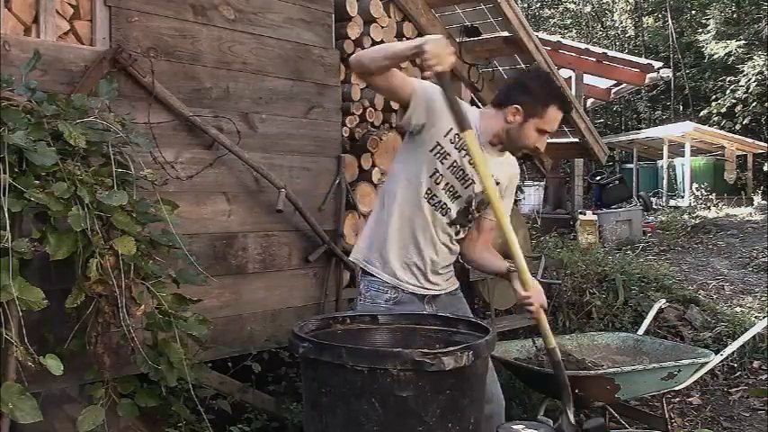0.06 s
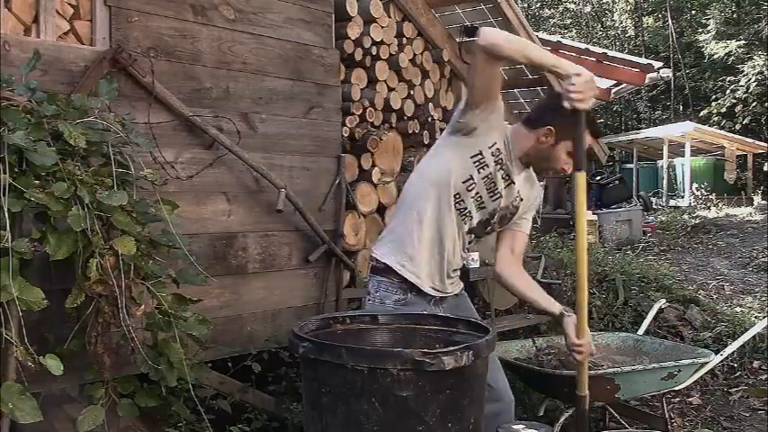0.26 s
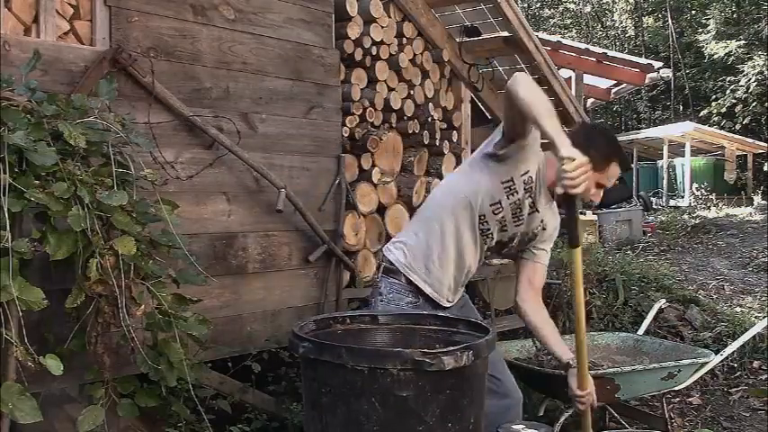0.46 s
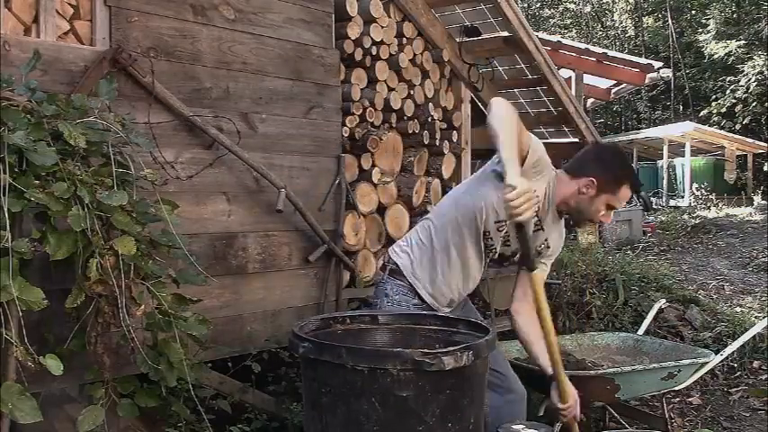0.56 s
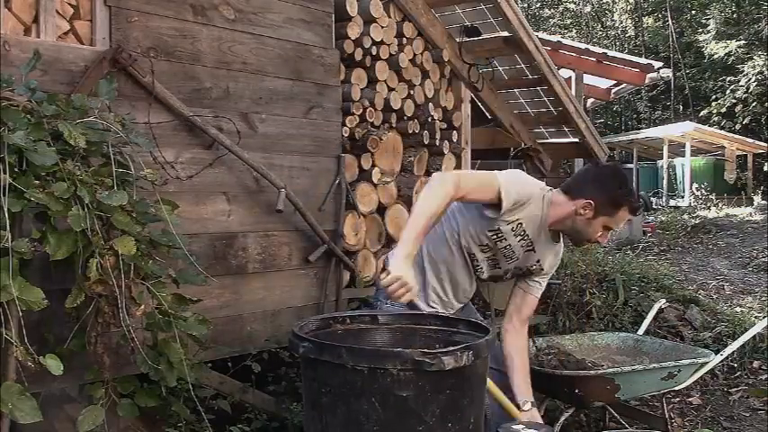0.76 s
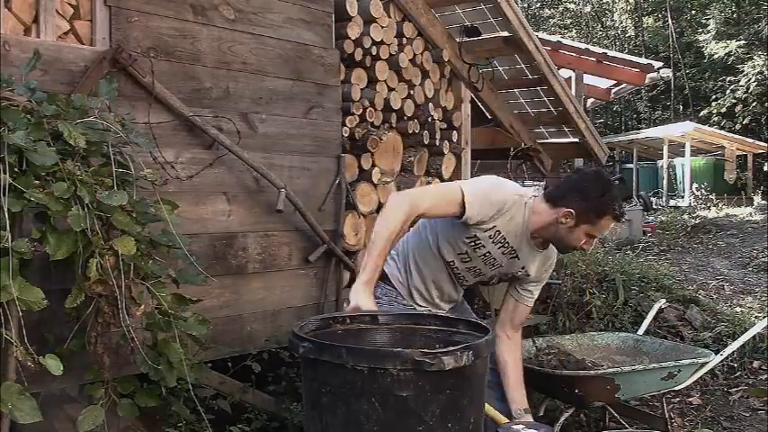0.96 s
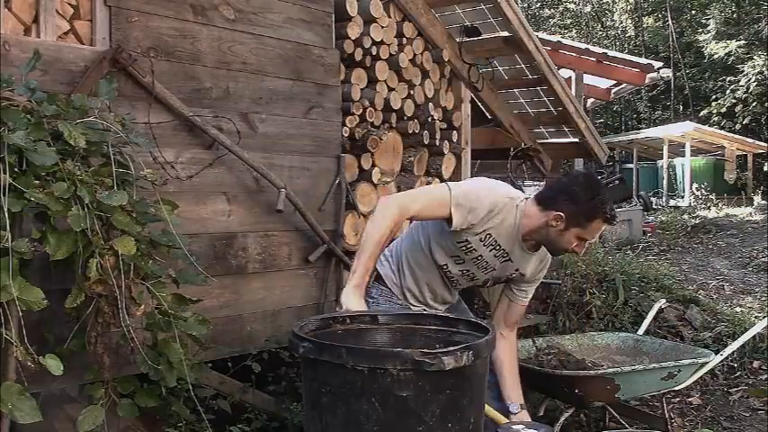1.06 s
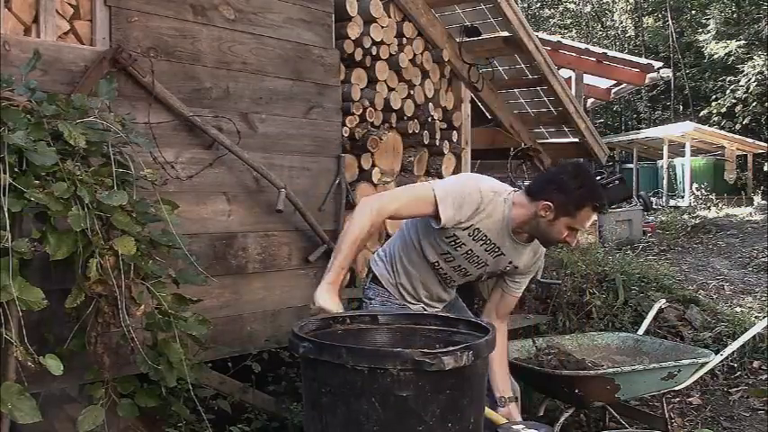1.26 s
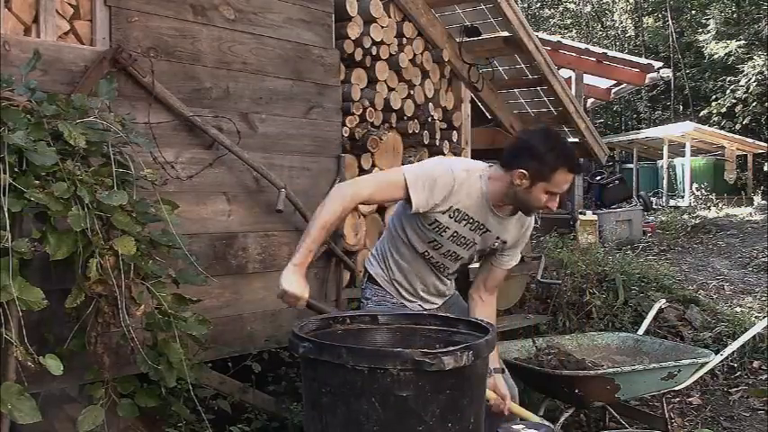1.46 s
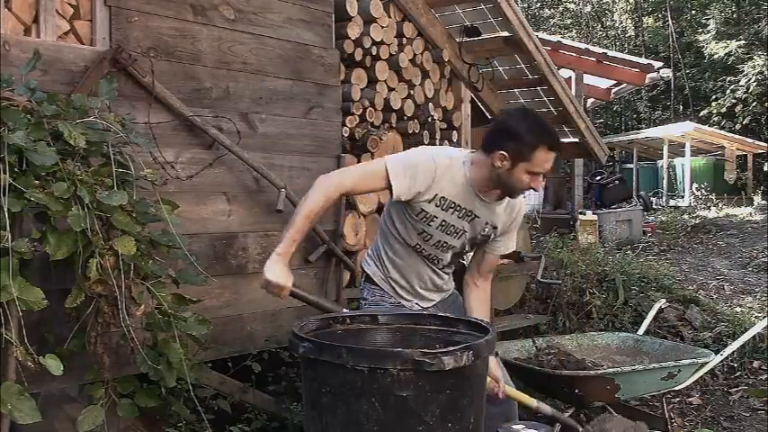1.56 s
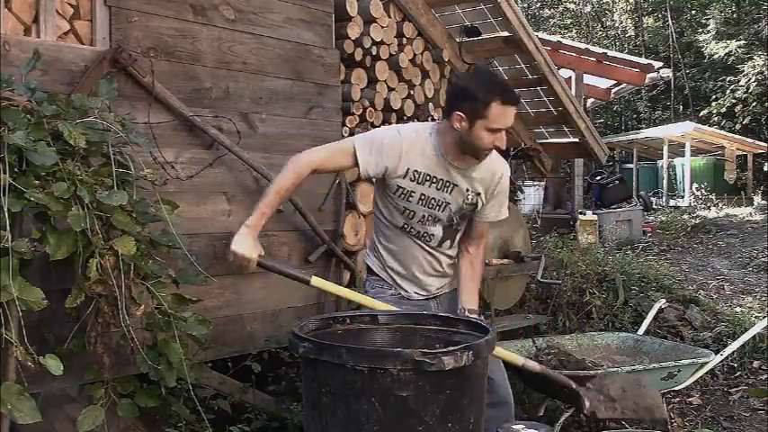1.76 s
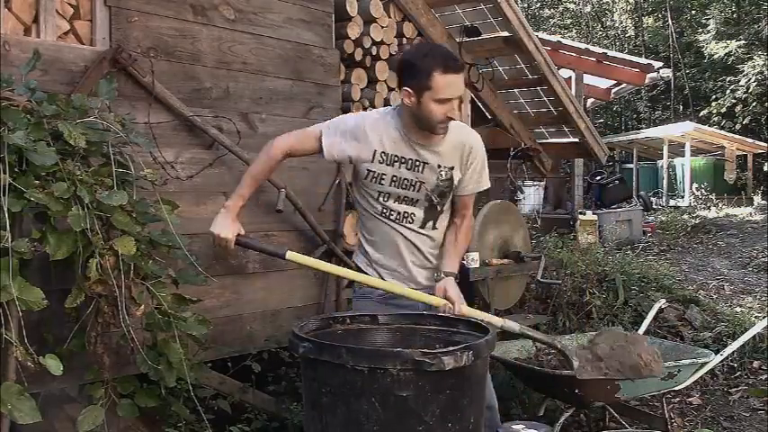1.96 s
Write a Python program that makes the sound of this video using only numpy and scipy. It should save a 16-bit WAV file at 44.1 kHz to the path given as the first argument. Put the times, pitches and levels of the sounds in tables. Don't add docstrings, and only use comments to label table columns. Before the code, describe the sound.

Metal shovel blade bites hard into stony sand, grinding and thudding in a quiet yard.

```python
import sys
import numpy as np
from scipy import signal
from scipy.io import wavfile
from scipy.ndimage import uniform_filter1d

SR = 44100
rng = np.random.default_rng(int(sys.argv[2]) if len(sys.argv) > 2 else 0)


def generate_wav(sig):
    pcm = np.round(np.clip(np.atleast_2d(sig).T, -1, 1) * 32767).astype(np.int16)
    wavfile.write(sys.argv[1], SR, pcm)


def rack_gain(trim_db):
    fader = np.asarray(trim_db, float)
    return 10 ** (fader / 20)


N = 88200


def evened(x):
    return x / np.sqrt(np.mean(x ** 2) + 1e-20)


def read(points, hz):
    f, value = np.transpose(points)
    return np.interp(np.log(hz + 1), np.log(f + 1), value)


def smooth_noise(count, size):
    return evened(uniform_filter1d(rng.standard_normal(count), size=size))


def colour(x, points):
    log_gain = np.log(rack_gain(read(points, abs(np.fft.fftfreq(4096, 1 / SR)))))
    response = np.exp(np.conj(signal.hilbert(log_gain)))
    taps = np.fft.ifft(response).real[:2048]
    return signal.oaconvolve(x, taps)[:N]


def resonate(x, hz, width):
    turn = np.exp(2j * np.pi * np.cumsum(hz * np.ones(N)) / SR)
    r = np.exp(-np.pi * width / SR)
    return 2 * (turn * signal.lfilter([1 - r], [1, -r], x / turn)).real


def swells(rows):
    t = np.arange(N) / SR
    power = np.zeros(N)
    for peak, rise, t60, db in rows:
        drop = np.where(t < peak, 30 * (peak - t) / rise, 60 * (t - peak) / t60)
        power += rack_gain(db - drop) ** 2
    return np.sqrt(power)


def grains(rows, per_s, spread_db, broad, rings, ring_db):
    hits = (rng.random(N) < per_s / SR) * rng.standard_normal(N)
    clicks = evened(hits * rack_gain(spread_db * np.minimum(rng.exponential(1, N), 4)))

    def ring(x):
        return sum(rack_gain(db) * resonate(x, hz, width) / np.sqrt(width) for hz, width, db in rings)

    driven = clicks * swells(rows)
    body = colour(driven, broad) / np.std(colour(clicks, broad))
    return body + rack_gain(ring_db) * ring(driven) / np.std(ring(clicks))


def struck_sine(t, hz):
    return (1 - np.exp(-(t * hz / 0.6) ** 2)) * np.sin(2 * np.pi * hz * t)


# frequency in Hz, level in dB per Hz.
AIR_SPECTRUM = [(25, -64), (60, -4), (200, -1), (600, -6), (2000, -12), (5000, -17.5), (10000, -26.5),
                (16000, -35)]
# frequency in Hz, likeness from -1 to 1.
AIR_LIKENESS = [(60, 1), (240, 0.69), (950, 0.67), (3770, 0.82), (15000, 1)]


def air():
    level_db, patchy_db = -56.5, 1.2
    frames, hz = N // 256 + 5, np.fft.rfftfreq(1024, 1 / SR)
    a, b, c, d, patches = rng.standard_normal((frames, 513, 5)).T
    patches = uniform_filter1d(patches, size=14, axis=0)
    patches = evened(uniform_filter1d(patches, size=8, axis=1))
    same = np.clip(read(AIR_LIKENESS, hz), -1, 1)[:, None]
    left = a + 1j * b
    right = same * left + np.sqrt(1 - same ** 2) * (c + 1j * d)
    z = np.array([left, right]) * rack_gain(read(AIR_SPECTRUM, hz)[:, None] + patchy_db * patches)
    return rack_gain(level_db) * evened(signal.istft(z, nperseg=1024, noverlap=768)[1][:, :N])


# peak in seconds, rise in seconds, T60 in seconds, level in dB.
INSECT_SWELLS = [
    (.15, 0.32, 0.66, -64.5),
    (1.45, 0.14, 1, -66),
]


def insects():
    def band(hz, width):
        once = resonate(rng.standard_normal(N), hz, width)
        return evened(resonate(once, hz, width))

    chorus = band(4100, 900) + rack_gain(-8.5) * band(7620, 200)
    return swells(INSECT_SWELLS) * chorus


# peak in seconds, rise in seconds, T60 in seconds, blade level in dB, grit level in dB.
SLIPS = [(0.016, 0.0019, 0.016, -50, -49), (0.021, 0.0026, 0.041, -55, -47.5),
         (.2, 0.0018, 0.019, -62, -49.5), (0.249, 0.00092, 0.18, -20, -33.5),
         (0.307, 0.058, 0.95, -50.5, -34), (0.38, 0.0019, 0.036, -20, -22), (0.416, 0.087, 0.16, -27, -26),
         (0.499, 0.054, 0.11, -37.5, -44.5), (0.557, 0.01, 0.19, -37.5, -52),
         (0.589, 0.015, 0.056, -33.5, -48), (0.612, 0.014, 0.12, -23.5, -22.5),
         (0.656, 0.025, 0.33, -41.5, -45.5), (0.708, 0.21, 0.32, -36, -42.5),
         (0.735, .02, 0.071, -62, -36.5), (0.78, 0.0031, 0.17, -34, -36.5), (0.978, 0.045, 0.2, -36.5, -41),
         (1.005, 0.033, 0.08, -37.5, -37), (1.137, .002, 0.26, -57.5, -57),
         (1.211, 0.0065, 0.18, -62, -59.5), (1.248, 0.006, 0.33, -58, -58), (1.55, 0.15, 0.17, -59, -70),
         (1.845, 0.04, 0.33, -58.5, -55), (1.672, 0.0033, 0.035, -52.5, -90), (1.895, 0.15, 0.15, -48, -52)]
# frequency in Hz, width in Hz, level in dB.
BLADE_MODES = [(1046, 110, -8.5), (1570, 74, -31), (1917, 51, 0.5), (2493, 69, 5.5), (2933, 120, 6.5),
               (3470, 83, 9), (3775, 57, 7.5)]
# frequency in Hz, level in dB.
BLADE_BODY = [(88, -44.5), (150, -12.5), (366, -7), (643, -9.5), (1570, -1), (1830, -7), (2210, -4.5),
              (9000, -24), (11700, -85), (19800, -120)]


def blade():
    rows = [(peak, rise, t60, db) for peak, rise, t60, db, _ in SLIPS]
    scrape = grains(rows, 5000, 0.71, BLADE_BODY, BLADE_MODES, ring_db=-5.5)
    return scrape + pebbles(rows)


def pebbles(rows):
    per_s, cycles, level_db = 50, 18, -1.5
    steady, forced = np.zeros((2, N))
    force, t = swells(rows), np.arange(3000) / SR
    for hz in np.geomspace(500.7, 5113, num=30):
        hits = (rng.random(N) < per_s / SR) * rng.standard_normal(N)
        u = hz * t / cycles
        ring = np.sqrt(hz) * np.sqrt(u) * np.exp(-3 * u) * np.sin(2 * np.pi * hz * t)
        steady += signal.oaconvolve(hits, ring)[:N]
        forced += signal.oaconvolve(hits * force, ring)[:N]
    return rack_gain(level_db) * colour(forced, BLADE_BODY) / np.std(colour(steady, BLADE_BODY))


# frequency in Hz, level in dB.
GRIT_BODY = [(1500, -6), (4500, -8), (5500, 1.5), (7000, -1.5), (10000, -6), (13000, -15), (16000, -24)]
# frequency in Hz, width in Hz, level in dB.
GRIT_MODES = [(5490, 130, 9), (6580, 130, 13), (7150, 100, 6.5), (7750, 67, -20)]


def grit():
    rows = [(peak, rise, t60, db) for peak, rise, t60, _, db in SLIPS]
    return grains(rows, 13000, 1.4, GRIT_BODY, GRIT_MODES, ring_db=-12)


# start in seconds, level in dB, frequency in Hz, T60 in seconds.
KNOCKS = [(.05, -50.5, 870, .15), (0.251, -26, 367, 0.27), (.251, -18, 945, 0.05), (.251, -22.5, 559, 0.13),
          (.252, -19.5, 2300, 0.097), (.253, -25.5, 1700, 0.12), (0.253, -25.5, 2840, 0.086),
          (.251, -21, 3330, 0.06), (0.555, -37, 214.5, 0.18), (0.631, -27, 226, 0.069),
          (.382, -19, 2420, 0.018), (.38, -17, 5640, 0.024), (0.381, -19.5, 7150, 0.033),
          (.3815, -20, 1360, 0.013), (.384, -16.5, 998, 0.02), (0.589, -25.5, 1617, .04),
          (0.607, -18, 1744, 0.042), (0.608, -25.5, 3890, 0.12), (.78, -19, 1550, 0.042),
          (0.784, -25, 4020, 0.049), (.783, -26.5, 2080, 0.077), (.783, -22.5, 2926, 0.041),
          (.611, -21.5, 2260, 0.023), (.614, -22, 6500, .04), (1.0052, -13.5, 305, 0.045),
          (1.006, -34, 690, .04), (1.014, -28, 1010, 0.037), (1.031, -28, 350, .05), (.251, -24, 290, .07),
          (.265, -22, 2150, .04), (1.329, -48, 1500, 0.037), (.292, -29, 5450, .08),
          (.405, -27, 1083, 0.17), (.41, -25, 1920, 0.098), (1.006, -38, 4030, 0.09),
          (1.023, -33, 416, 0.045), (1.045, -37, 340, 0.073), (1.137, -47, 5500, 0.017),
          (1.506, -53, 1085, .06), (1.754, -38, 258, 0.031), (1.771, -54.5, 1480, 0.35),
          (1.834, -34, 474, 0.031), (1.876, -29, 466, 0.05), (1.898, -30, 468, 0.045),
          (1.876, -38, 1030, .03), (1.899, -38, 1060, .03), (1.849, -45, 1900, .05)]


def knocks():
    out, t = np.zeros(N + SR), np.arange(SR // 2) / SR
    for start, db, hz, t60 in KNOCKS:
        drift = uniform_filter1d(smooth_noise(len(t), 200), size=200)
        waver = 1 + 0.25 * evened(drift)
        first = round(start * SR)
        out[first:first + len(t)] += waver * rack_gain(db - 60 * t / t60) * struck_sine(t, hz)
    return out[:N]


# start in seconds, level in dB, frequency in Hz.
TICKS = [(.2492, -2.5, 6000), (.2497, -6, 3070), (.2508, -15, 2800), (.2524, -12, 2930), (.255, -14, 1760),
         (.2566, -11, 2680), (.2618, -8, 2200), (.2672, -12, 1700), (.2773, -8.5, 2120), (.289, -16, 1500),
         (.2965, -25, 5500), (.3965, -18, 1090), (.4038, -27, 1290), (.4155, -6.5, 4220),
         (.4265, -15, 1130), (.497, -23, 1710), (.501, -19, 1600), (.611, -17, 3840), (.614, -13.5, 2240),
         (.6175, -10, 6500), (.7003, -24, 1830), (.712, -28, 600), (.715, -22, 1890), (.7345, -28, 7040),
         (.7823, -12, 4970), (.785, -16, 4040), (.7872, -7.5, 8600), (.827, -28, 4000), (.972, -27.5, 1010),
         (.981, -25, 1340), (1.0055, -18.5, 1330)]


def ticks():
    out, t = np.zeros(N + SR), np.arange(1000) / SR
    for start, db, hz in TICKS:
        first = round(start * SR)
        out[first:first + len(t)] += rack_gain(db - 60 * t * hz / 10.7) * struck_sine(t, hz)
    return out[:N]


# peak in seconds, rise in seconds, T60 in seconds, level in dB.
CRACKS = [
    (.2505, 0.0015, 0.16, -23),
    (.607, 0.0068, 0.044, -40),
    (.7815, 0.0041, 0.1, -27),
    (.965, 0.015, 0.056, -56),
    (1.33, 0.014, 0.089, -62.5),
    (1.877, 0.002, 0.054, -48),
    (1.9, .003, 0.029, -56.5),
]
# frequency in Hz, level in dB.
CRACK_BODY = [(300, -31), (1100, -10), (1700, 2.5), (3000, -3), (5000, -1), (7500, 2.5), (9500, -20),
              (16000, -73)]


def cracks():
    return grains(CRACKS, 10000, 1.3, CRACK_BODY, BLADE_MODES, ring_db=-2.7)


# peak in seconds, rise in seconds, T60 in seconds, level in dB.
SHOVES = [(.252, 0.0035, 0.13, -34), (.39, 0.029, 0.37, -50), (.502, .04, 0.091, -46.5),
          (.56, 0.0042, .15, -52), (.625, 0.019, 0.21, -36.5), (.666, 0.029, 0.085, -40),
          (.715, 0.092, 0.34, -35), (.783, 0.0032, 0.095, -36), (.85, 0.11, 0.033, -46),
          (1.01, 0.049, 0.15, -35), (1.16, 0.065, 0.08, -54.5), (1.56, 0.17, 0.26, -55),
          (1.85, 0.12, 0.48, -51), (1.92, 0.029, 0.073, -51.5)]
# frequency in Hz, level in dB.
SAND_BODY = [(40, -55), (100, -19), (170, -4), (220, 8), (550, -7), (900, -1.5), (2000, -36.5)]
# frequency in Hz, width in Hz, level in dB.
SAND_MODES = [(300, 72, -2.5), (363.8, 15.5, 3), (479, 26, -1), (576.4, 30, -3.5)]


def sand():
    return grains(SHOVES, 1200, 1.6, SAND_BODY, SAND_MODES, ring_db=-2)


def shovel():
    contact = blade() + grit() + knocks() + ticks() + cracks() + sand()
    high_pass = signal.butter(2, 168, "high", fs=SR, output="sos")
    return signal.sosfilt(high_pass, contact)


def yard(x):
    t60 = 0.026
    taps = np.zeros(4000)
    taps[np.arange(20, 3980, 20) + rng.integers(0, 20, 198)] = rng.choice([-1., 1.], 198)
    taps = taps * rack_gain(-60 * np.arange(4000) / SR / t60)
    return signal.fftconvolve(x, taps / np.linalg.norm(taps))[:N]


# time in seconds, low pipe in Hz, high pipe in Hz, level in dB.
WHISTLE = [
    (1.205, 2600, 2660, -67),
    (1.23, 2630, 2720, -59.5),
    (1.291, 2600, 2700, -60.5),
    (1.33, 2520, 2690, -62.5),
    (1.44, 2424, 2685, -61.5),
    (1.5, 2327, 2460, -65),
    (1.659, 2373, 2440, -67),
]


def bird():
    time, low, high, db = np.transpose(WHISTLE)
    t = np.arange(N) / SR

    def voice(pitch):
        flutter = 1 + 0.5 * smooth_noise(N, 400)
        hz = np.interp(t, time, pitch) + 35 * smooth_noise(N, 400)
        return flutter * np.sin(2 * np.pi * np.cumsum(hz) / SR)

    whistle = voice(low) + rack_gain(-1) * voice(high) + rack_gain(-6) * voice((low + high) / 2)
    return rack_gain(np.interp(t, time, db, -120, -120)) * whistle


# frequency in Hz, level in dB.
SIDE_SPECTRUM = [(100, -14), (300, -1), (550, 5.5), (1000, -1), (2000, 4), (4500, 3), (9500, 5),
                 (11000, -20)]


def scene():
    background = air() + insects()
    tool = shovel()
    side = rack_gain(-25.5) * colour(tool + rack_gain(-5.5) * yard(tool), SIDE_SPECTRUM)
    return background + tool + np.array([-side, side]) + bird()


def top_cut(x):
    return signal.sosfilt(signal.butter(12, 16290, fs=SR, output="sos"), x)


def record(dry):
    low_pass = signal.firwin(255, 15700, window=("kaiser", 9), fs=SR)
    mix = signal.oaconvolve(np.tanh(dry), low_pass[None], "same")
    return top_cut(mix)


dry = scene()
out = record(dry)
generate_wav(out)
```